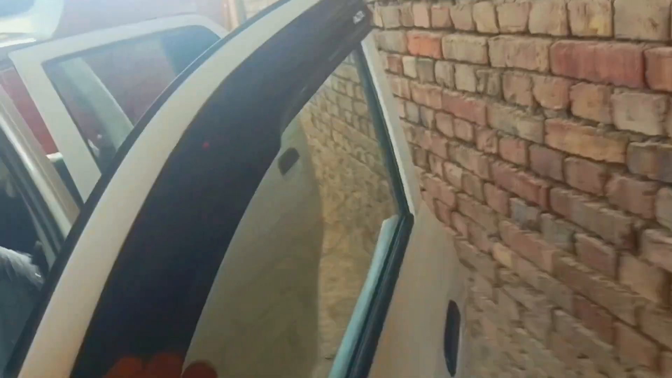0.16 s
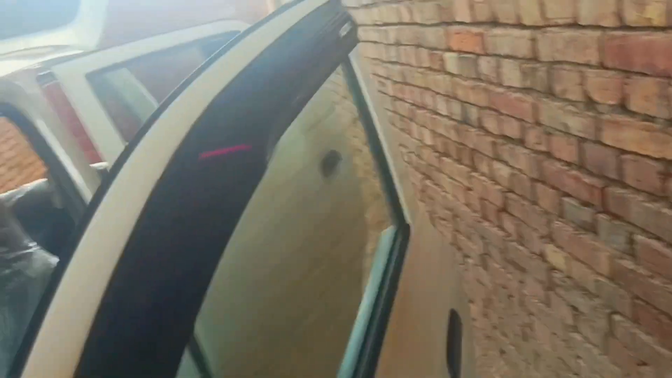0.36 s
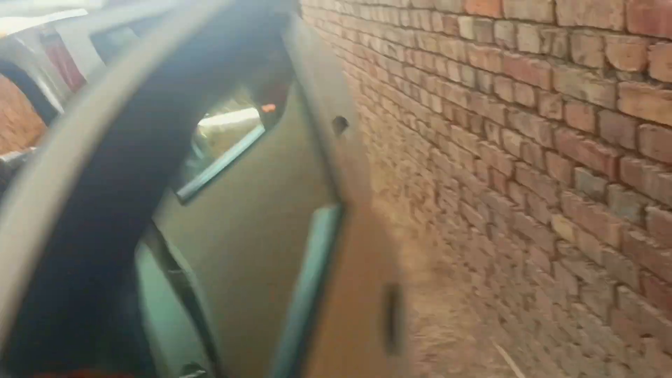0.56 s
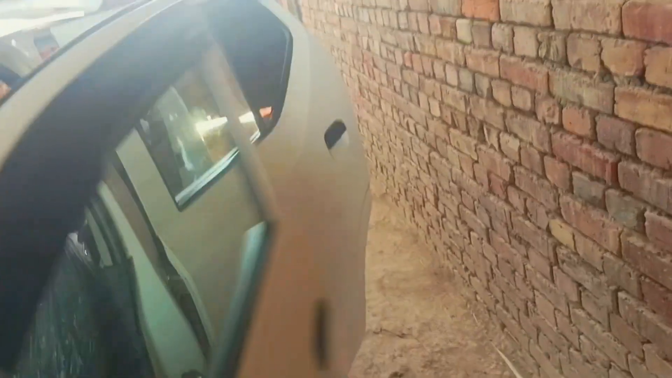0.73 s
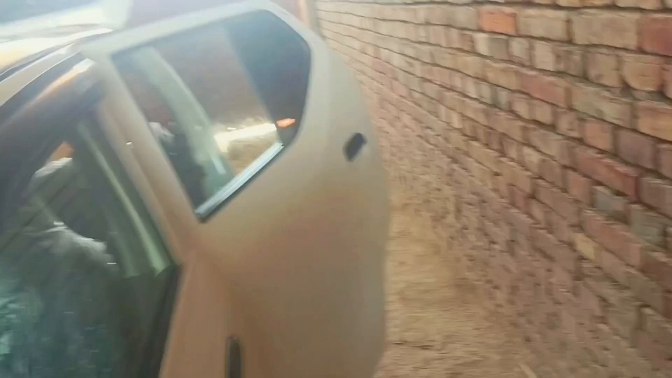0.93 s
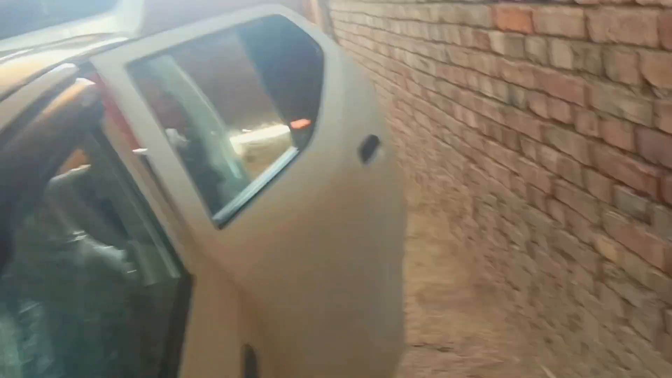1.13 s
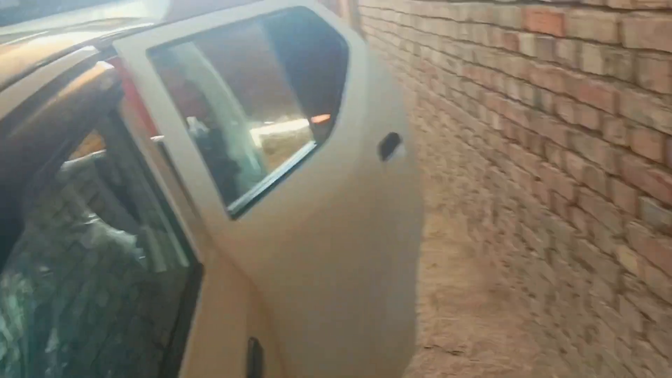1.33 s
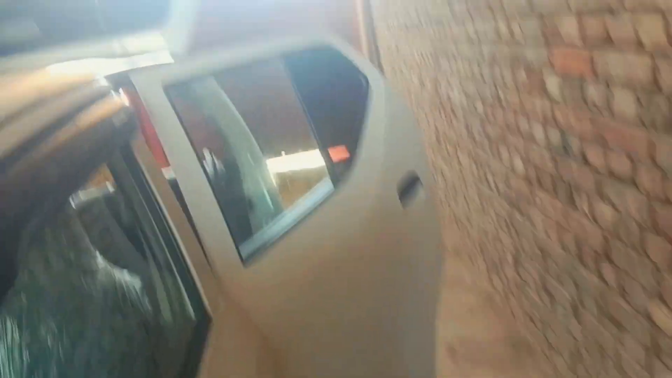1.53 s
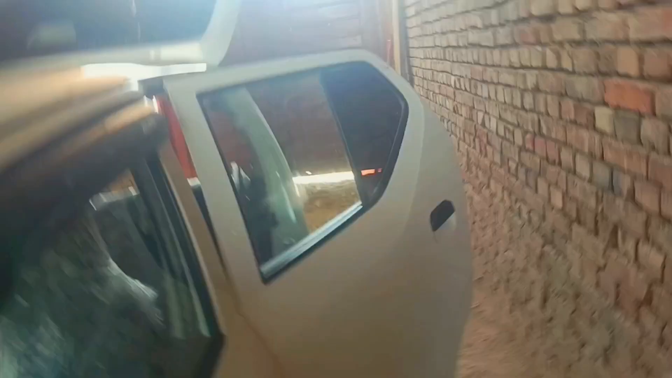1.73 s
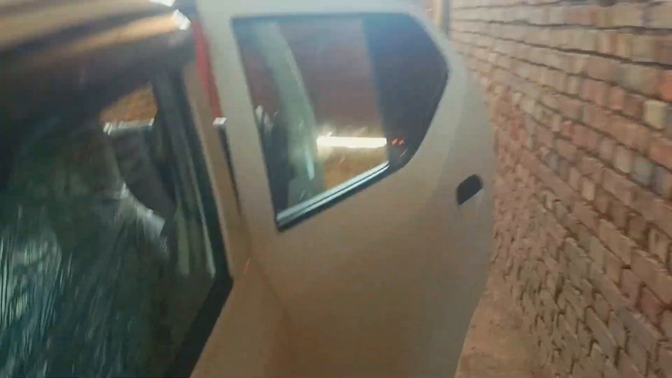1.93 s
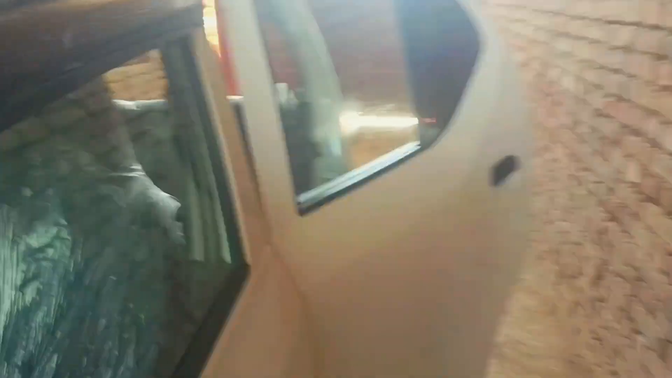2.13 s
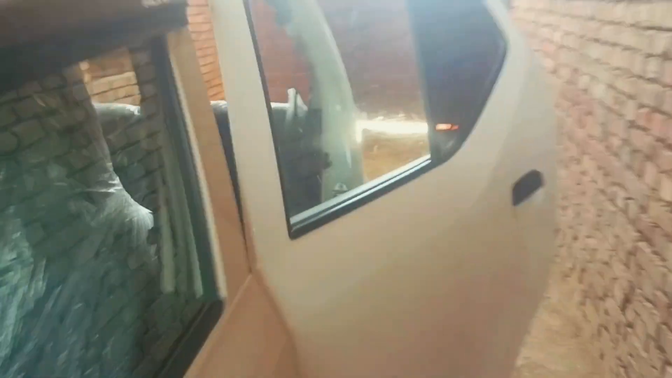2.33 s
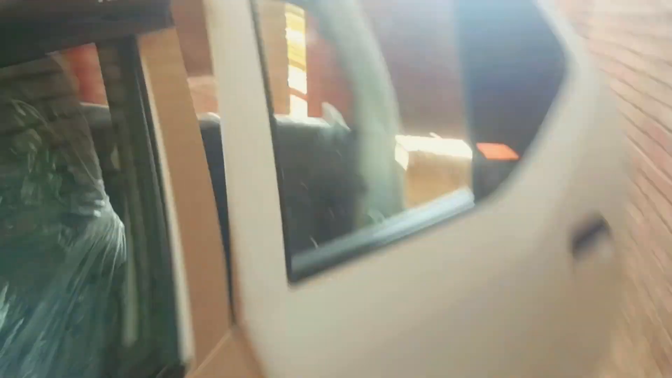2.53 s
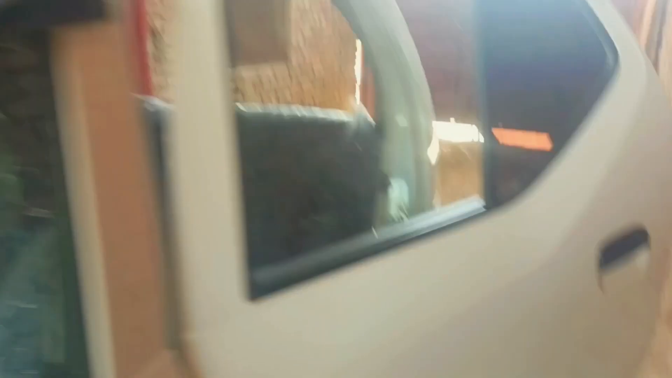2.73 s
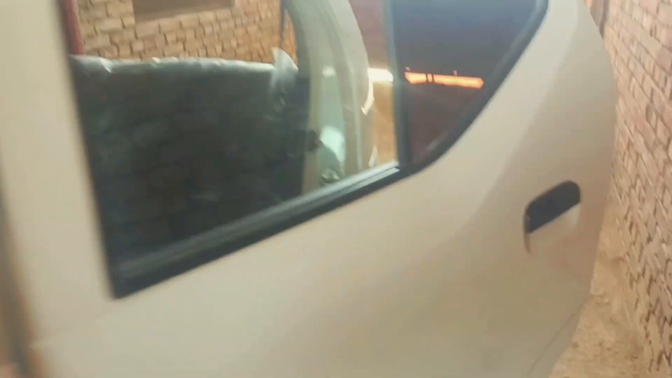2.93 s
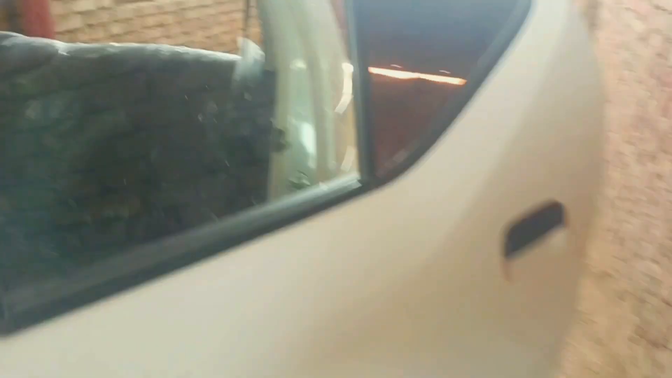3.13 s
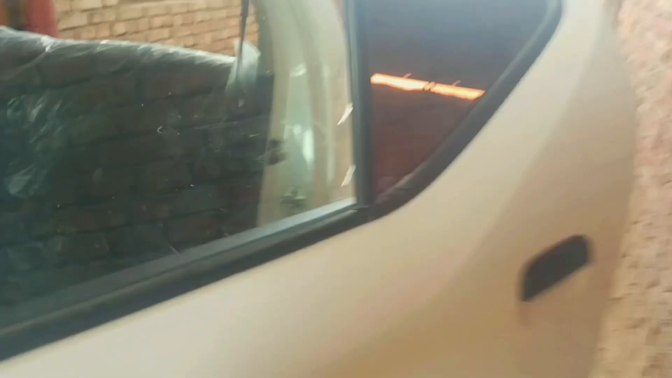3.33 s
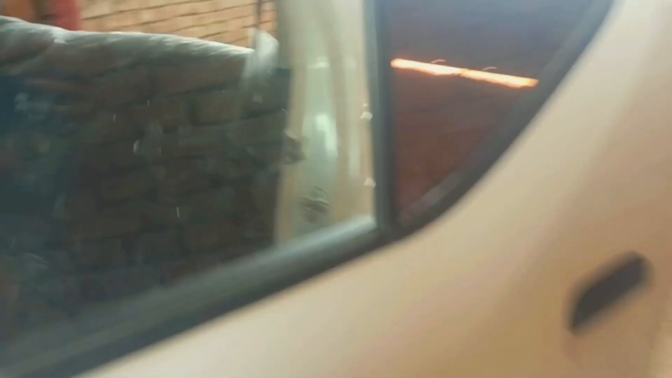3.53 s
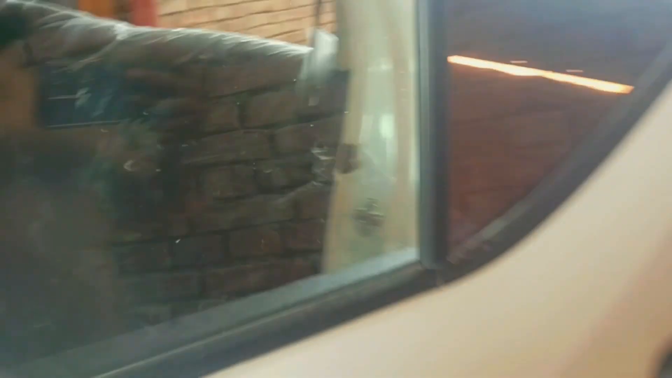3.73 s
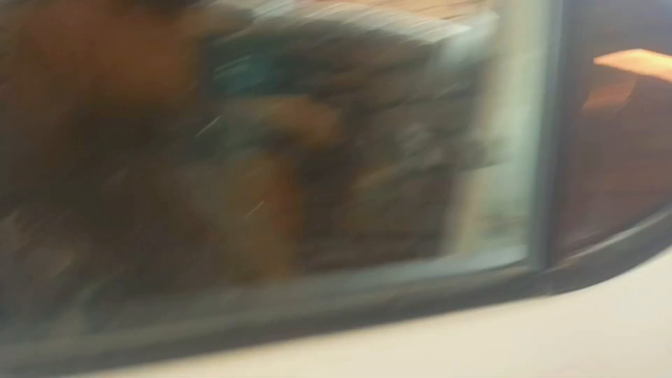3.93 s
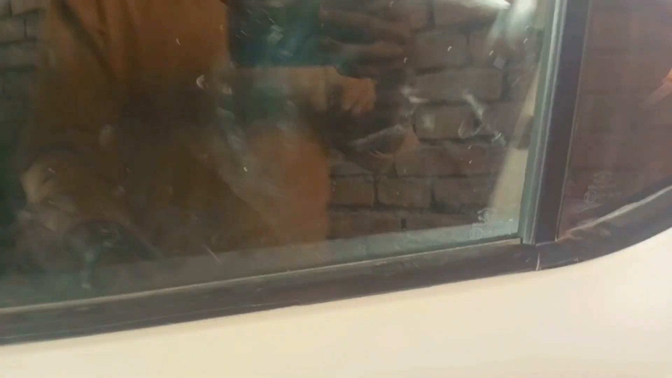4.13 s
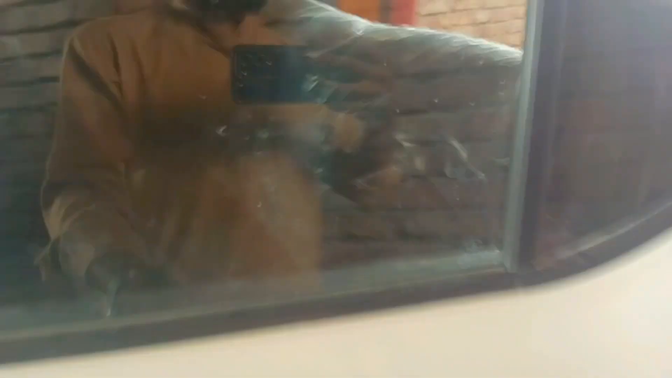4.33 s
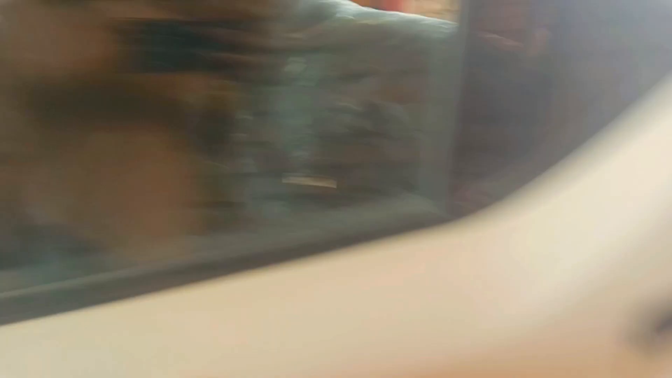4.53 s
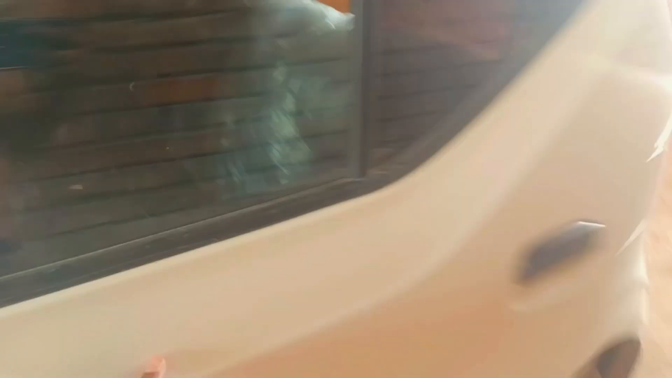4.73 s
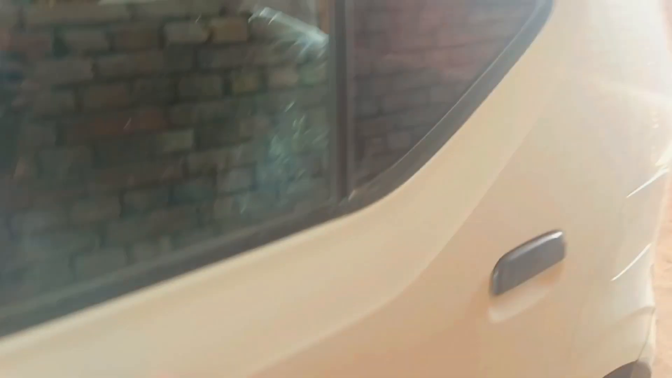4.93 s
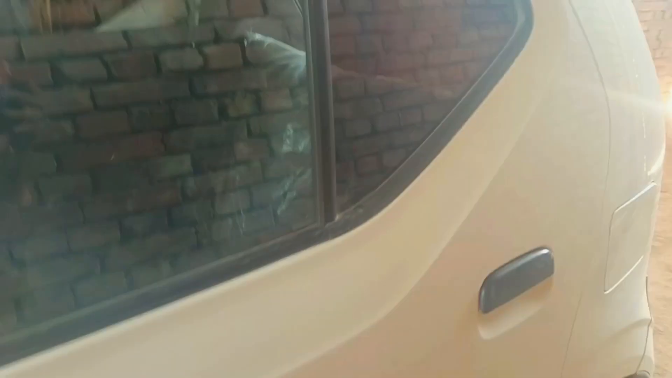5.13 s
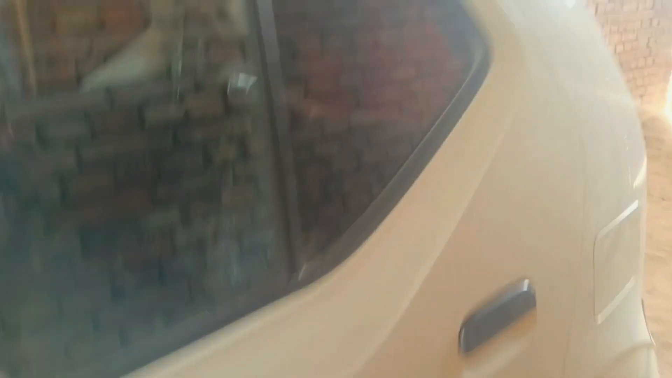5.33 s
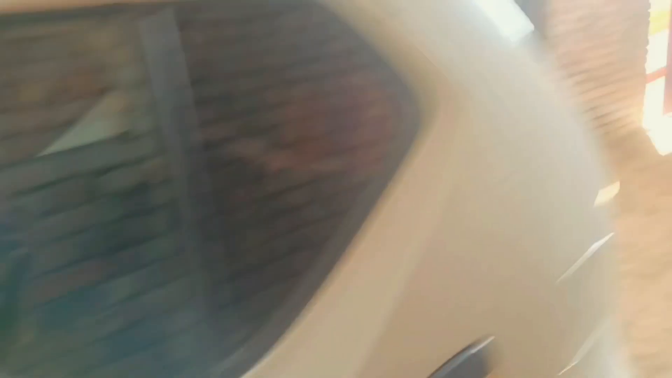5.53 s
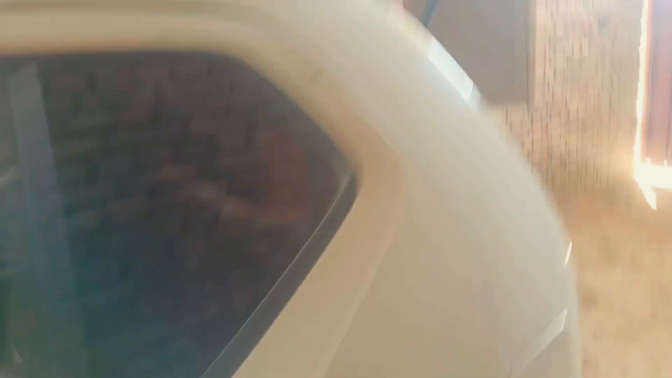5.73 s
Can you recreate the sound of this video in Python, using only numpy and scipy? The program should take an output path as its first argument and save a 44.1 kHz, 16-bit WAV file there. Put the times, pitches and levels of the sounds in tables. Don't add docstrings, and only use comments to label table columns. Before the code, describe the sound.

A hand-held phone is close to a car in a narrow brick alley. At 0 s shoes scuff on dirt and cloth rustles, with faint ticks until 1.0 s. At about 1.04 s a door slams: several latch and seal blows in quick succession, a hard bright thunk with low body, then a loose pane rattling and weakening until about 1.45 s. Scuff and knock come at 1.6 s, a very faint hinge squeak at 1.7 s, a heel knock at 1.87 s. Light clatter at 2.6 s leads to a sharp, bright handle snap at 2.78 s. Firm gritty heel knocks land at 3.23 and 3.49 s, a fainter one at 3.8 s, then near quiet. At 4.9 s the second door slams, full and boomy, with a short ring and rustling tail, and small ticks at 5.5 and 5.7 s. Low town rumble and hiss open and close in patches; the walls give a short echo.

```python
import sys
import numpy as np
from scipy import signal
from scipy.fft import rfft, irfft, next_fast_len
from scipy.io import wavfile
from scipy.ndimage import uniform_filter1d

SR = 44100
rng = np.random.default_rng(int(sys.argv[2]) if len(sys.argv) > 2 else 0)


def unload_audio(sound):
    columns = np.transpose(np.atleast_2d(sound))
    steps = np.round(np.clip(columns, -1, 1) * 32767)
    wavfile.write(sys.argv[1], SR, steps.astype(np.int16))


def boost(x):
    u = np.asarray(x, float) / 20
    return 10 ** u


N = 254181
T = np.arange(N) / SR
GATE_CLOSE_DB_S = 900


def shape(points, hz):
    f, db = np.transpose(points)
    return np.interp(np.log(hz + 1), np.log(f), db, left=-90, right=-90)


def noise(db_of_hz, count=N):
    size = next_fast_len(count)
    spectrum = rfft(rng.standard_normal(size))
    x = irfft(spectrum * boost(db_of_hz(np.fft.rfftfreq(size, 1 / SR))), size)[:count]
    return x / x.std()


def band(lo_hz, hi_hz, hz, steep_db=60):
    octaves_out = np.maximum(np.log2(lo_hz / (hz + 1)), np.log2((hz + 1) / hi_hz))
    return -steep_db * np.maximum(0, octaves_out)


def walk(rate_hz):
    k = int(SR / rate_hz)
    held = np.repeat(rng.standard_normal(N // k + 1), k)
    return 1.2 * uniform_filter1d(uniform_filter1d(held, k), k)[:N]


def decay(t, t60):
    return boost(-60 * t / max(t60, .004))


def struck(t, hz, t60):
    return np.sin(2 * np.pi * hz * t) * decay(t, t60)


def opened(t, s, length, db, sag_db, close_db):
    outside = np.maximum(t - s - length, 0) + 3.1 * np.maximum(s - t, 0)
    return boost(db - sag_db * np.clip(t - s, 0, length) - close_db * outside)


def add(out, s, x):
    i = int(max(s, 0) * SR)
    out[i:i + len(x)] += x[:N - i]


def rustle():
    # t/s, length/s, f/Hz, width/Hz, level/dB
    rustles = [(-0.1, .09, 2650, 1100, -39), (.02, 0.085, 1650, 370, -44), (0, 0.132, 600, 690, -57),
               (.19, 0.095, 1700, 350, -53), (.39, .06, 1120, 300, -65), (1.88, 0.23, 2100, 301, -60),
               (2.4, 0.43, 1780, 140, -64.5), (2.82, 0.22, 2150, 250, -52), (2.5, 0.2, 3110, 110, -57),
               (2.85, 0.19, 1700, 150, -65), (2.58, .2, 950, 200, -62.5), (2.0, .2, 2620, 200, -63),
               (2, .25, 3320, 240, -63), (2.5, .2, 2200, 270, -64), (3.225, 0.076, 1400, 540, -37.5),
               (3.23, .09, 750, 370, -45), (3, .05, 1370, 350, -56), (4, 0.13, 2100, 330, -63),
               (4, .05, 4030, 500, -72), (3.5, 0.072, 520, 200, -58), (4, 0.3, 9400, 600, -73.5),
               (5.12, .45, 1680, 260, -47.5), (5, 0.57, 1410, 210, -55), (5, .1, 2800, 100, -56),
               (5.13, .1, 3630, 500, -60), (5.3, 0.13, 2500, 150, -60), (5.3, 0.11, 3500, 300, -62),
               (5.555, 0.09, 3170, 40, -58), (5.5, .25, 1400, 230, -64.5)]
    out, t = np.zeros(N), T[:SR // 2]
    for s, length, hz, width_hz, db in rustles:
        swell = np.sin(np.pi * np.clip(t / length, 0, 1)) * boost(2.5 * walk(30.8)[:len(t)])
        hum = noise(lambda f: -30 * np.log10(1 + (2 * (f - hz) / width_hz) ** 2), count=len(t))
        add(out, s, boost(db) * swell * hum)
    return out


def rumble():
    # f/Hz, level/dB per Hz
    bass_spectrum = [(15, -64), (25, -32), (38, -17), (97, 2.5), (119, 3), (149, -1.5), (194, -11.5),
                     (260, -31.5), (340, -56.5), (570, -120)]
    drone_spectrum = [(120, -30.5), (200, 6), (243, -3), (399, -1), (424, -3.5), (615, -25), (750, -47),
                      (980, -73.5), (1650, -120)]
    # t/s, length/s, level/dB, sag/dB/s, upper half over lower/dB
    bass_openings = [(0, 0.86, -50, 6, -10.5), (0.936, 0.12, -76, -36, -3), (1.172, 0.059, -22.5, 30, -12),
                     (1.245, 0.28, -35.5, 31, -0.5), (1.557, 0.52, -48, -2.5, 2.5),
                     (2.085, 0.24, -54, 47, -13.5), (2.389, 0.029, -54, 5, -16),
                     (2.455, 0.037, -47.5, 62, -14.5), (2.585, 0.68, -40.5, 18.5, 1),
                     (3.234, 0.23, -46, 12, -0.5), (3.487, 0.23, -39, 53, -8),
                     (3.737, 0.19, -49, -12.5, 1.5), (3.985, 0.21, -52.5, 14, 18.5),
                     (4.253, 0.03, -59.5, -30.5, 18.5), (4.363, 0.13, -71, -27, 8),
                     (4.53, 0.13, -53, -6, 1), (4.706, 0.14, -56, -45.5, -5), (4.947, 0.18, -31, 22, -4),
                     (5.13, 0.25, -40.5, 12, -12.5), (5.418, 0.29, -50, 2, 3)]
    # t/s, length/s, level/dB, sag/dB/s
    drone_openings = [
        (0, 0.042, -53, 87),
        (1.153, 0.6, -38.5, 47),
        (1.903, 0.15, -55, 96.5),
        (2.633, 0.16, -73, 21.5),
        (3.244, 0.35, -78.5, -5),
        (3.799, 0.091, -61.5, 27),
        (5.004, .8, -43.5, -3),
    ]
    bass = noise(lambda f: shape(bass_spectrum, f)) * boost(0.95 * walk(25))
    split = signal.butter(2, 115, fs=SR, output="sos")
    low = signal.sosfiltfilt(split, bass)
    t = T[::64]

    def bass_gain(side):
        gain = boost(-78)
        for *opening, upper_db in bass_openings:
            gain = gain + boost(side * upper_db / 2) * opened(t, *opening, GATE_CLOSE_DB_S)
        return np.interp(T, t, gain)

    drone_gain = boost(-87) + sum(opened(t, *row, GATE_CLOSE_DB_S) for row in drone_openings)
    drone = noise(lambda f: shape(drone_spectrum, f)) * boost(2.0 * walk(20))
    return bass_gain(-0.8) * low + bass_gain(1) * (bass - low) + np.interp(T, t, drone_gain) * drone


def hiss():
    # f/Hz, level/dB per Hz
    air_spectrum = [(880, -37), (1500, -11.5), (2110, -3.5), (4800, -8), (5640, -6.5), (9310, -9.5),
                    (11400, -23), (15100, -18), (16000, -28), (16500, -48)]
    # t/s, length/s, level/dB, sag/dB/s, tilt/dB/octave
    hiss_openings = [(0, 0.12, -31, 60, -4.5), (0.155, .25, -42.5, 19, -3.5),
                     (0.532, 0.059, -65.5, 30, 5.5), (0.643, 0.24, -58, 31, 3),
                     (0.931, 0.079, -52.5, 18, 1), (1.121, 0.34, -19.5, 84.5, -11.5),
                     (1.345, 0.88, -41.5, 0, -1.5), (2.286, .27, -43.5, 30.5, 0.4),
                     (2.578, 0.3, -45.5, 9, -4.5), (2.719, 0.3, -40.5, 11.5, -4.5),
                     (3.046, 0.17, -50.5, 13, -1.5), (3.3, 0.27, -42, 37.5, -5), (3.46, .04, -65, 12, 3.5),
                     (3.542, 0.021, -62, 14, 4), (3.696, 0.057, -70.5, 11.5, 4.5),
                     (4.094, 0.365, -69, 10, -6.5), (4.729, 0.19, -70, -14, -5),
                     (4.976, 0.58, -37, 16, -11.5), (5.21, 0.12, -67, -84, -22),
                     (5.345, 0.22, -51.5, 65, -22), (5.342, 0.03, -57.5, 30, 3),
                     (5.49, 0.076, -57.5, -3, 3.5), (5.566, .2, -50, 0, -2)]
    # t/s, lowest f/Hz, hold/s, closing/s
    edge_dips = [
        (0, 686, 0.024, .3),
        (1.053, 510, 0.39, 0.11),
        (1.606, 1230, .15, 0.15),
        (1.88, 990, 0.02, 0.31),
        (2.583, 770, 0.07, 0.33),
        (4.894, 520, 0.25, 0.056),
        (5.144, 1113, 0.3, 0.58),
    ]
    rest_hz = 1428
    hz, frames, cells = signal.stft(noise(lambda f: 0 * f), SR, nperseg=1024)
    octaves = np.log2(np.clip(hz, 1500, 7500) / 3200)[:, None]
    octaves = octaves + 0.73 * np.clip(octaves - .2, 0, .6)
    gain = boost(-70.5)
    for *opening, tilt_db in hiss_openings:
        gain = gain + boost(tilt_db * octaves) * opened(frames, *opening, 351)
    edges_hz = []
    for s, low_hz, hold, closing in edge_dips:
        closing_hz = np.interp(frames, [s + hold, s + hold + closing], [low_hz, rest_hz])
        edges_hz.append(np.where(frames < s, rest_hz, closing_hz))
    edge_hz = np.min(edges_hz, axis=0)
    db = shape(air_spectrum, np.maximum(hz, 1600))[:, None]
    db = db - 130 * np.maximum(np.log2(edge_hz / (hz[:, None] + 1)), 0)
    streaks = uniform_filter1d(rng.standard_normal(cells.shape), size=7, axis=1)
    streaks = uniform_filter1d(streaks, size=3, axis=0)
    streak_db = np.clip(-.2 * (20 * np.log10(gain) + 36) - 1.2 * octaves, 3, 7)
    cells = cells * gain * boost(db + streaks / streaks.std() * streak_db)
    return signal.istft(cells, SR, nperseg=1024)[1][:N]


def residue():
    # f/Hz, level/dB per Hz
    residue_spectrum = [(150, -35), (250, -4), (860, -5.5), (2320, -9.5), (9330, -22.5), (16000, -27.5)]
    return boost(-78.5) * noise(lambda f: shape(residue_spectrum, f))


def scuffs():
    # t/s, level/dB, length/s, t60/s, ring f/Hz
    drags = [(0.02, -36.5, 0.06, 0.13, 1810), (0.2, -49.5, 0.079, 0.13, 1670),
             (1.615, -39, 0.012, 0.28, 2970), (2.636, -43, 0.015, 0.074, 3570),
             (2.731, -56, 0.058, 0.092, 2000), (2.825, -53.5, 0.13, 0.4, 2160),
             (3.226, -32, 0.021, 0.103, 2400), (3.245, -31.5, 0.045, 0.17, 2730),
             (3.488, -50, 0.011, 0.23, 2340), (3.775, -56.5, 0.041, .1, 2660),
             (3.8, -46, 0.035, 0.031, 2190), (3.815, -44, 0.036, 0.08, 2640),
             (4.046, -65.5, 0.045, 0.16, 2500), (4.215, -62, 0.051, 0.086, 1950),
             (4.463, -59, 0.044, 0.076, 2344), (4.588, -69, 0.028, 0.049, 2020),
             (4.771, -69, 0.14, 0.11, 2840)]
    # f/Hz, level/dB per Hz
    grit_spectrum = [(120, -12.5), (200, -5.5), (373, -10.5), (548, -15.5), (836, -17), (1370, -5.5),
                     (2130, -8.5), (2700, -10.5), (5040, -13.5), (6520, -17), (16000, -38.5)]
    out, t = np.zeros(N), T[:SR // 2]
    for s, level_db, length, t60, hz in drags:
        low_db = np.clip(5 * (level_db + 42.0), -30, 0)

        def colour(f):
            sole_db = 8 * np.exp(-(np.log2((f + 1) / hz) / 0.19) ** 2)
            return shape(grit_spectrum, f) + sole_db + low_db * np.clip(1.2 * np.log2(1750 / (f + 1)), 0, 1)

        grit = noise(colour, count=len(t)) * boost(1.8 * walk(300)[:len(t)])
        swell = np.minimum(t / (0.26 * length), 1) ** 2
        add(out, s, boost(level_db) * grit * swell * decay(np.maximum(t - length, 0), t60))
    return out


def clicks(rows):
    out, t = np.zeros(N), T[:SR // 5]
    for s, peak_db, hz, top_db in rows:
        t60 = 0.036 * (hz / 2500) ** -.45
        body = 0.23 * struck(t, hz, t60) + 0.27 * struck(t, 0.87 * hz, t60) + 0.094 * struck(t, 1.0 * hz, t60)
        spike = noise(lambda f: band(hz / 1.4, hz * 1.1, f, 29), count=len(t))
        spike = spike * (decay(t, 0.013) + 0.33 * decay(t, t60))
        snap = noise(lambda f: band(8200, 22000, f, 34), count=len(t)) * decay(t, 0.099 * t60)
        add(out, s, boost(peak_db) * (body + .6 * spike + boost(top_db) * snap) * np.minimum(t / 0.00065, 1))
    return signal.sosfilt(signal.butter(4, 1150, "high", fs=SR, output="sos"), out)


def ticks():
    # t/s, peak/dB, ring f/Hz, snap/dB
    tick_rows = [(0.3292, -40, 7100, 10), (0.4036, -35.5, 3035, -5), (0.65, -58.5, 5170, 18),
                 (0.9775, -49.5, 7230, 18.5), (0.9964, -44.5, 1990, 6), (0.533, -56, 7050, 12),
                 (1.205, -26, 4520, -25), (1.3168, -25.5, 2130, -25), (1.3734, -34, 4890, -25),
                 (1.377, -30, 1700, -28), (1.4177, -29.5, 2160, -8.5), (1.6212, -25, 1520, -8.5),
                 (1.711, -37, 2200, -25), (1.8722, -29.5, 1990, -17), (1.871, -37, 5500, -12),
                 (1.902, -33, 2500, -5), (1.9018, -29.5, 6000, -12.5), (2.581, -34, 2300, -34.5),
                 (2.5872, -31.5, 3530, -36), (2.6245, -42.5, 4300, -33), (2.597, -35.5, 2700, -30),
                 (2.6365, -36, 4500, -8), (2.6426, -28, 2060, -42), (2.643, -31.5, 4960, -20),
                 (2.6488, -29, 4380, -20), (2.6537, -32, 1840, -30.5), (2.7446, -35, 2330, -21),
                 (3.1028, -42.5, 3250, -35), (3.236, -19.5, 2610, -8), (3.286, -26, 2400, -13),
                 (3.472, -52, 6500, 2.5), (3.4942, -27, 2210, -19), (3.543, -42, 7340, -14),
                 (3.692, -50, 7290, -14), (3.778, -52.5, 3000, -3), (3.7853, -47.5, 7400, -6),
                 (3.947, -59.5, 2696, 8.5), (4.2065, -53, 1850, 4.5), (5.514, -38, 3303, -20),
                 (5.718, -46, 5250, -20)]
    return clicks(tick_rows)


def knocks():
    # t/s, peak/dB, ring f/Hz, t60/s
    knock_rows = [(0.403, -48, 308.4, 0.54), (1.611, -30, 900, 0.27), (1.643, -32.5, 614, 0.1),
                  (1.871, -19, 994, 0.045), (1.878, -31.5, 700, 0.23), (1.891, -33, 603, 0.24),
                  (1.914, -35, 288, 0.34), (2.599, -55.5, 510, 0.45), (2.638, -49, 1028, 0.22),
                  (3.232, -19, 470, 0.12), (3.286, -20.5, 537, 0.18), (3.482, -23.5, 463, 0.27),
                  (3.492, -22.5, 207, 0.21), (3.812, -42.5, 790, 0.26), (3.83, -45, 524, 0.18),
                  (4.589, -56.5, 437, 0.35)]
    out, t = np.zeros(N), T[:SR // 2]
    for s, peak_db, hz, t60 in knock_rows:
        tone = struck(t, hz, 0.32 * t60) if 0.32 * t60 > 0 else 0
        hollow = noise(lambda f: band(hz / 1.31, hz * 1.16, f, 30), count=len(t)) * decay(t, t60)
        add(out, s, boost(peak_db - 5.0) * (tone + 0.34 * hollow) * np.minimum(t / 0.002, 1))
    return out


def door(blows, panels, shell, fade, mix):
    level_db, panel_db, droop_s = mix
    fade_hz, fade_s = np.transpose(fade)
    out, t = np.zeros(N), T[:SR]
    for s, peak_db, thud_db in blows:
        ring = np.zeros(len(t))
        for hz, db, t60 in panels:
            bass_db = thud_db * np.clip(np.log2(1000 / hz), 0, 1)
            mode = struck(t, hz, min(t60, 1.3 * (100 / hz) ** 0.56))
            ring += boost(db + panel_db + bass_db) * rng.choice([-1, 1]) * mode
        ring = ring * boost(3.0 * walk(60)[:SR]) * np.minimum(t / 0.0016, 1)
        for hz in 35 * 2 ** np.arange(0, 9, .75):
            bass_db = thud_db * np.clip(np.log2(1000 / hz), 0, 1)
            db = shape(shell, hz) + 10 * np.log10(hz / 300) + bass_db
            grain = noise(lambda f: band(hz / 1.3, hz * 1.3, f) + shape(shell, f) - shape(shell, hz), count=SR)
            t60 = np.interp(np.log(hz), np.log(fade_hz), fade_s)
            crack_and_fade = decay(t, t60) + 2.2 * decay(t, 0.042)
            ring = ring + boost(db) * grain * crack_and_fade * np.minimum(t / (0.77 / hz + 0.003), 1)
        add(out, s, boost(peak_db + level_db) * ring)
    return out * boost(-12 * (np.maximum(T - blows[0][0], 0) / droop_s) ** 3).clip(1e-4)


def doors():
    # t/s, peak/dB, thud weight/dB
    door_blows = [
        [(1.041, -29.5, -1), (1.051, -5, -4), (1.068, 3.5, -6.5), (1.079, -6.5, 6.5), (1.103, -16, 11.5),
         (1.168, -22, 12.5)],
        [(4.895, -20.5, 8), (4.898, 0, -4), (4.912, -1, 0), (4.946, -12.5, 6.5), (4.999, -15.5, 1.5)],
    ]
    # f/Hz, level/dB, t60/s
    door_panels = [
        [(76, -10, 0.99), (86.94, -7, .6), (322.0, 3.0, 0.046)] + [(116, -6, 0.25), (165.6, -20, 0.58), (250.3, -19.5, 5.0), (357.7, -5.0, 0.27), (474.0, -22.5, 3.0), (678, -16.5, 0.7)] + [(1093, -8.5, 0.1), (1304, -5.5, .1), (2137, -12.5, 0.11), (2400, -12, 0.083), (2708, -13.5, 0.095)],
        [(65.5, -7.5, 1.0), (174.6, -3.0, 0.93), (314, 6.5, 0.094)] + [(298, 4, 0.17), (356.0, -11.0, 0.27), (396, -8, 1.0), (446, -2.5, 1.5), (529.5, -11.5, 1.1), (555, -18.5, 5.0)] + [(900, -13.5, 0.18), (1083, -5, 0.15), (1345, -3, 0.121), (1787, -8.5, 0.1), (2133, -6, 0.078), (2347, -8, 0.07), (2706, -9, 0.07)],
    ]
    # f/Hz, level/dB per Hz
    door_shells = [
        [(24, -38), (40, -7.5), (103, -7.5), (203, -9), (353, -5), (453, -10.5), (582, -12.5), (785, -14),
         (1090, -15), (2360, -20.5), (9110, -42), (11700, -48.5), (15800, -46.5)],
        [(24, -40.5), (40, -8), (69, -2.5), (133, -6), (303, -8.5), (344, -10), (453, -8.5), (676, -19.5),
         (1200, -16), (1750, -22.5), (2140, -21), (3440, -26), (15800, -53)],
    ]
    # f/Hz, t60/s
    door_fades = [
        [(50, 1.5), (200, 0.83), (800, 0.41), (3000, 0.36), (12000, 0.62)],
        [(50, 1), (200, 0.8), (800, 0.84), (3000, 0.44), (12000, 0.42)],
    ]
    # level/dB, panel level/dB, droop/s
    door_mixes = [
        (-14, -2, 0.55),
        (-11, -6, 0.2),
    ]
    return sum(door(*parts) for parts in zip(door_blows, door_panels, door_shells, door_fades, door_mixes))


def latch():
    # t/s, level/dB, f/Hz, t60/s
    latch_rings = [(1.052, -17, 1269, .12), (1.067, -9.5, 2137, 0.041), (1.067, -11.5, 1093, 0.1),
                   (1.068, -12, 598, 0.085), (1.072, -12.5, 2506, 0.039), (1.079, -10.5, 1283, 0.069),
                   (1.08, -14.5, 639, 0.058), (1.101, -13.5, 351.4, 0.07), (1.113, -18.5, 675, 0.072),
                   (1.131, -17.5, 330, .1), (1.148, -17, 239.5, 0.072), (4.898, -8.5, 1236, 0.084),
                   (4.898, -11.5, 2596, 0.032), (4.899, -16, 900, 0.063), (4.912, -14.5, 2186, 0.12),
                   (4.912, -13.5, 1253, 0.091), (4.895, -20, 301, 0.038), (4.913, -14, 330, .05),
                   (4.92, -17, 1356, .1), (4.946, -16, 1093, 0.052), (4.947, -16, 2167, .05),
                   (4.998, -15.5, 438, 0.086)]
    out, t = np.zeros(N), T[:SR // 4]
    for s, db, hz, t60 in latch_rings:
        pair = struck(t, hz, t60) + .45 * struck(t, 1.07 * hz, 0.64 * t60)
        add(out, s, boost(db) * pair * np.minimum(t / .0008, 1))
    return out


def thumps():
    # t/s, level/dB, f/Hz, t60/s
    air_thumps = [
        (4.908, -4.5, 218, 0.065),
        (4.935, -10, 70, .45),
        (1.09, -13, 68, .8),
        (1.18, -15, 105, .2),
    ]
    out, t = np.zeros(N), T[:SR // 2]
    for s, db, hz, t60 in air_thumps:
        add(out, s, boost(db) * struck(t, hz, t60) * np.minimum(t * hz, 1))
    return out


def pane_rattle():
    pane_sides = [
        (1.1947, -17, 6.5, 2000),
        (1.1937, -13.5, 10.5, 5300),
        (1.101, -17.5, 7, 4200),
    ]
    swings_s = (.0608, .0601, .0632)
    strike_counts = (4, 4, 5)
    rows = []
    for (s, db, loss_db, hz), swing, count in zip(pane_sides, swings_s, strike_counts):
        for k in range(count):
            rows.append((s + k * swing, db - k ** 0.94 * loss_db, hz, -28))
    return clicks(rows)


def hinge_squeak():
    # t/s, length/s, f/Hz, level/dB
    squeak = (1.70, .17, 975, -60)
    s, length, hz, db = squeak
    swell = np.sin(np.pi * np.clip((T - s) / length, 0, 1)) * boost(2.6 * walk(40.7))
    return boost(db) * swell * noise(lambda f: band(hz / 0.993, hz * 0.91, f, 330))


def handle_snap():
    # t/s, peak/dB
    bounces = [
        (2.7845, -13),
        (2.787, -18.5),
        (2.793, -24),
    ]
    # f/Hz, level/dB, t60/s
    handle_parts = [(1800, -8, .025), (2280, -4, .025), (3000, -7, .03), (4200, -2, .014), (4750, 1, .016),
                    (5400, -3, .012), (9800, -9, .012)]
    out, t = np.zeros(N), T[:SR // 5]
    for s, peak_db in bounces:
        ring = np.zeros(len(t))
        for hz, db, t60 in handle_parts:
            ring += boost(db) * struck(t, hz * (1 + 0.026 * rng.standard_normal()), t60)
        crack = noise(lambda f: band(3600, 5100, f, 5) + band(100, 10500, f, 30), count=len(t))
        crack = crack * decay(t, 0.012)
        add(out, s, boost(peak_db - 6) * (ring + 0.6 * crack) * np.minimum(t / 0.00009, 1))
    return signal.sosfilt(signal.butter(8, 1550, "high", fs=SR, output="sos"), out)


def alley(small):
    t = T[:SR // 2]
    echo = noise(lambda f: band(200, 6700, f, 6), count=len(t)) * decay(t, 0.048) * np.minimum(t / 0.013, 1)
    return boost(-12) * signal.fftconvolve(small, echo / np.sqrt(np.sum(echo ** 2)))[:N]


def scene():
    town = rumble() + hiss() + residue()
    small = scuffs() + ticks() + knocks() + pane_rattle() + hinge_squeak() + handle_snap()
    slams = doors() + latch() + thumps()
    return (slams + rustle() + small + alley(small) + town)[None]


def band_limit(x):
    return signal.sosfilt(signal.butter(12, 16960, fs=SR, output="sos"), x)


def record(dry):
    # low f/Hz, high f/Hz
    mic_hz = (58, 16400)
    heard = signal.sosfilt(signal.butter(2, mic_hz[0], "high", fs=SR, output="sos"), dry)
    heard = signal.sosfilt(signal.ellip(8, .3, 50, mic_hz[1], fs=SR, output="sos"), heard)
    return band_limit(1.117 * np.tanh(heard / 1.295))


dry = scene()
out = record(dry)
unload_audio(out)
```